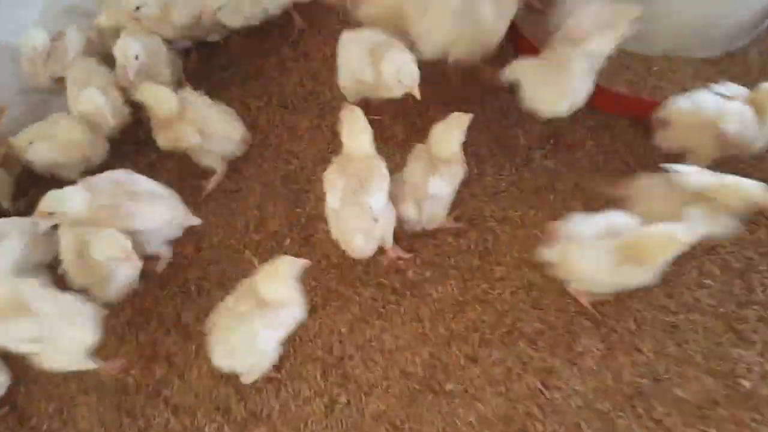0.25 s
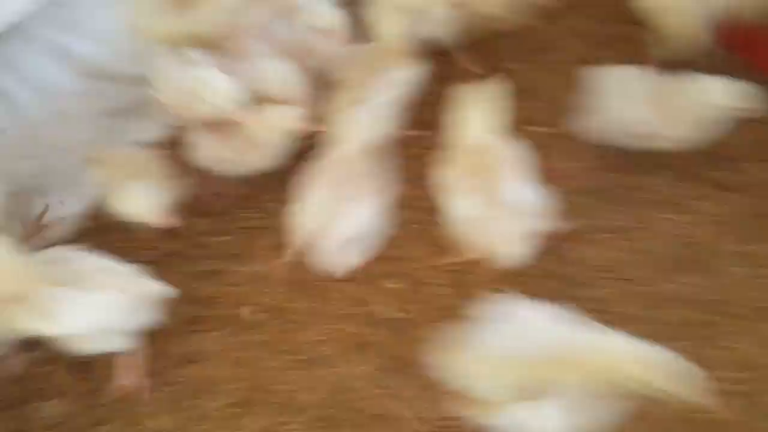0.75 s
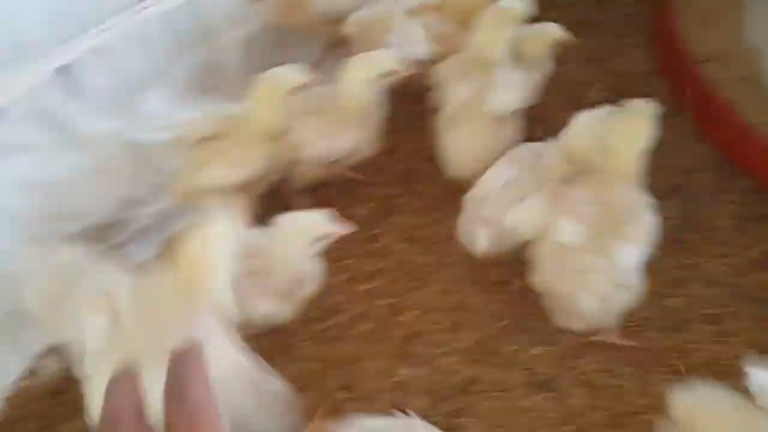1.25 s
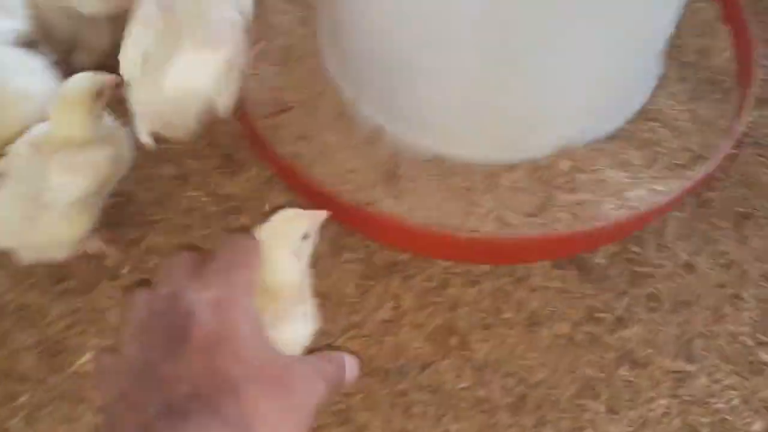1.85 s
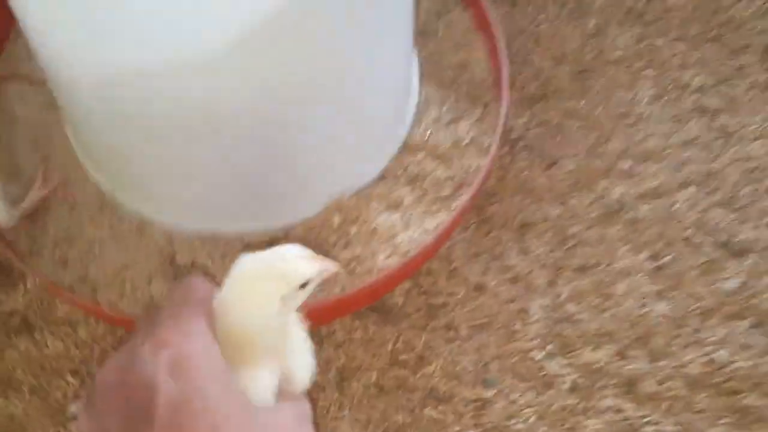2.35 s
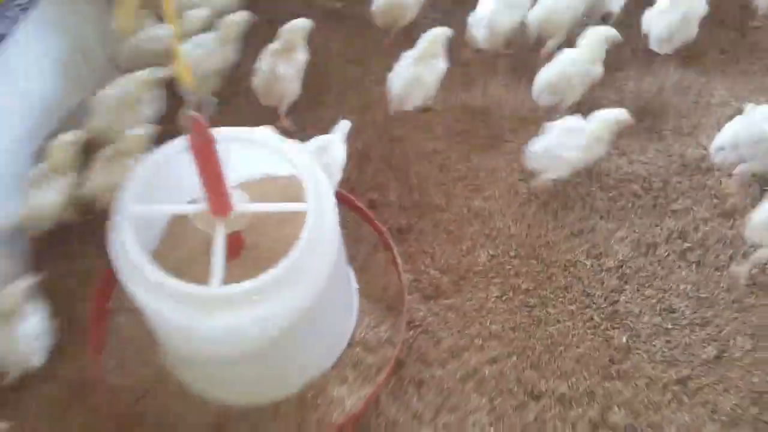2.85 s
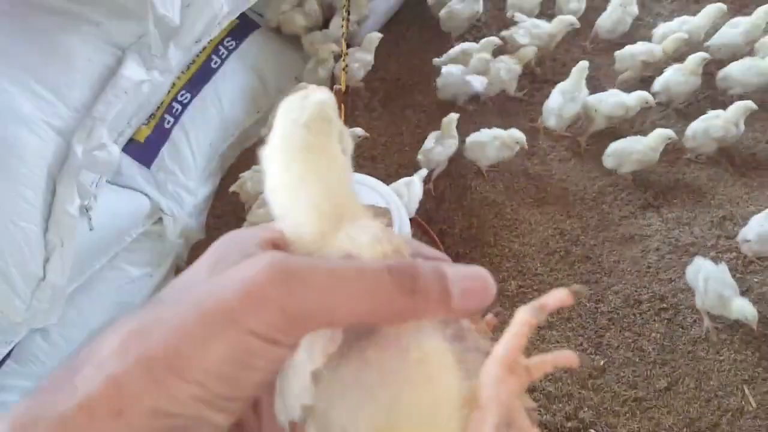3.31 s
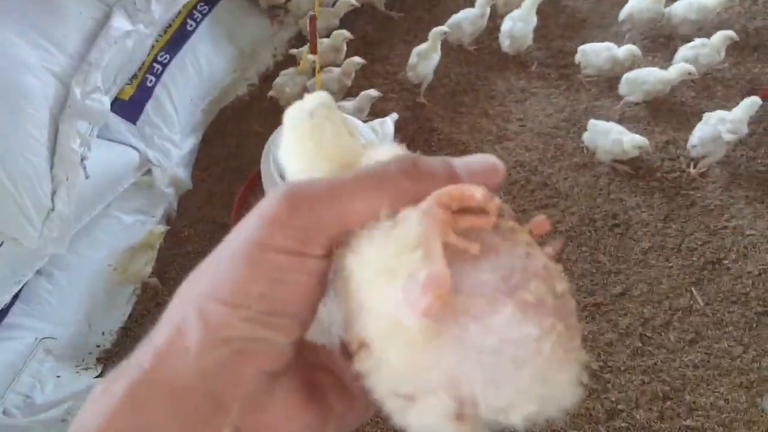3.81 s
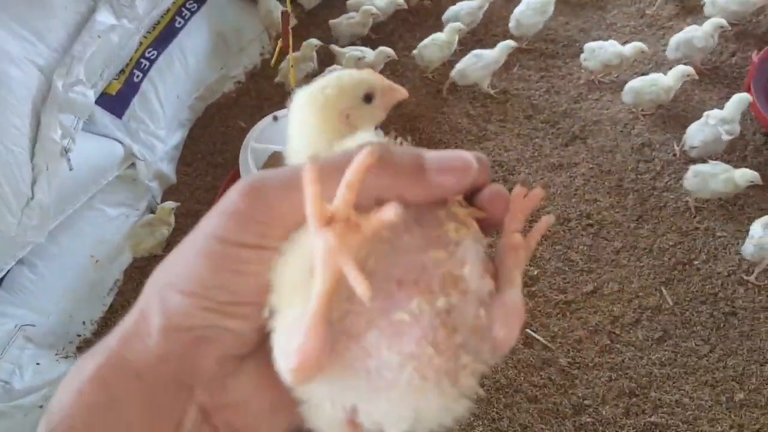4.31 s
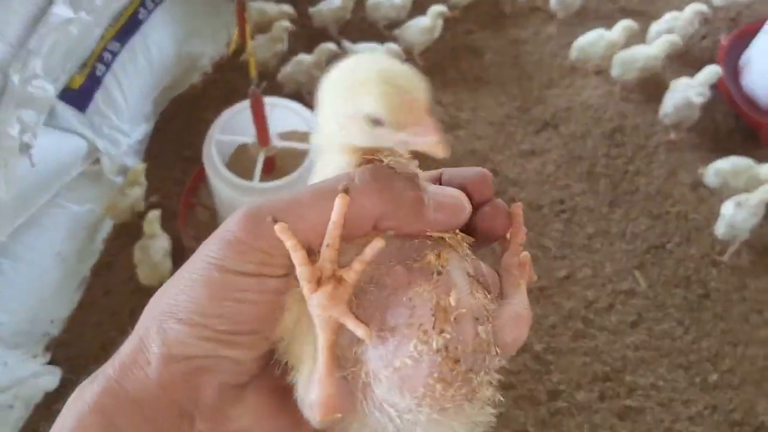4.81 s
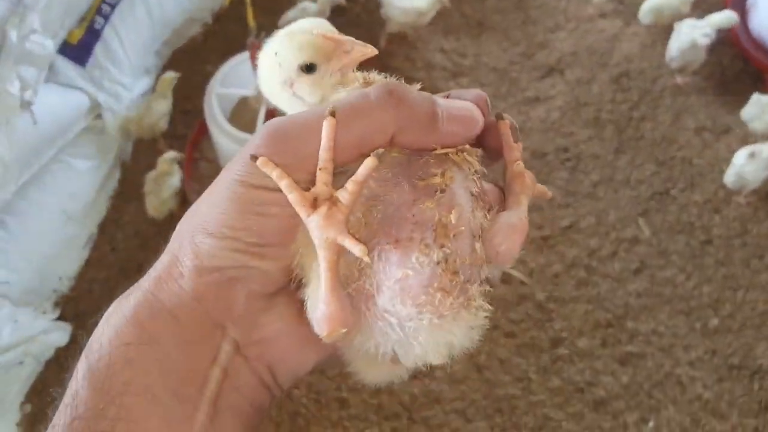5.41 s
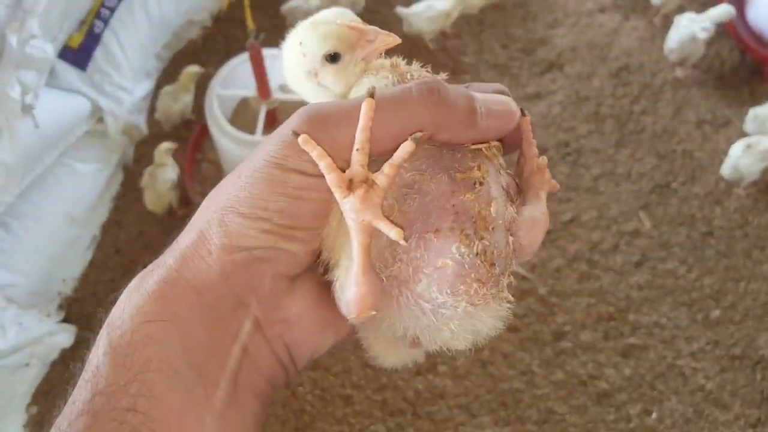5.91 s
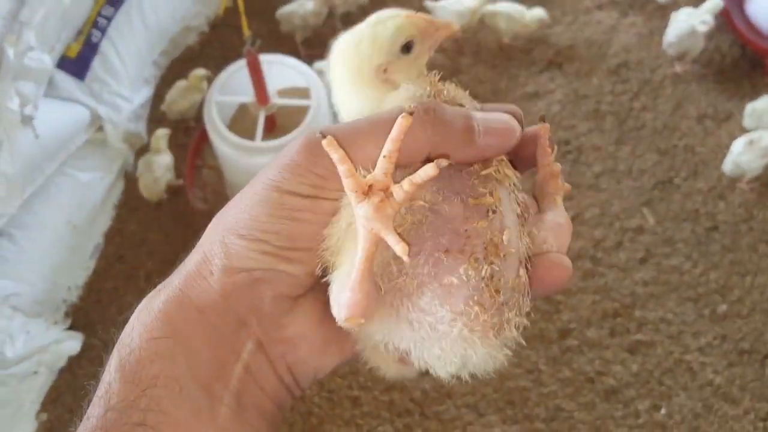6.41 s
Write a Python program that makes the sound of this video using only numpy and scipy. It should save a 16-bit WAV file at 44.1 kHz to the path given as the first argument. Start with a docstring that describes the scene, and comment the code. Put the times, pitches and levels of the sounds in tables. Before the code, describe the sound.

Dozens of young chicks peep in a dense overlapping chorus close to a handheld stereo microphone, feet rustling and tapping in dry litter. After about two seconds the near flock and rustle fade, and one chick held in the hand gives short, falling, warbling trills and thin whistles. A far flock keeps peeping diffusely in the shed, over faint insect hiss and low air rumble.

```python
"""Young chicks in a shed: falling, warbling peeps all at once, then from 2 s one chick in the hand trills close by
while the flock near it fades and a far chorus stays. Every voice is a frequency-modulated sine with weak harmonics.
Floor and feeder add two short echoes on each side, the shed a dense decay of noise. Feet rustle and tap in the litter
as filtered noise grains and damped sines. Behind lie still air, rumble at the ports, a hum, hissing insects and
low chirrups."""
import sys
import numpy as np
from scipy import signal
from scipy.io import wavfile
from scipy.ndimage import uniform_filter1d

SR = 44100
rng = np.random.default_rng(int(sys.argv[2]) if len(sys.argv) > 2 else 0)


def convert_level_to_amplitude(level_db):
    """Map a level in decibels to its linear amplitude factor."""
    exponent = np.asarray(level_db, float) / 20
    return 10 ** exponent


def log_audio(samples):
    """Write samples as a 16-bit WAV file to the path given in sys.argv[1]."""
    # one column per channel
    frames = np.atleast_2d(samples).T
    # limit to full scale, then quantise
    limited = np.clip(frames, -1, 1)
    pcm = np.round(limited * 32767).astype(np.int16)
    wavfile.write(sys.argv[1], SR, pcm)


N = 293706         # samples
RUN_IN = SR // 2   # samples; the flock is already calling at the start

# Overtones of the syrinx. Entries: level of the 2nd, 3rd and 4th harmonic in dB against the
# fundamental, ahead of the weighting by throat and beak.
OVERTONES = [-24.5, -50, -49]


def rms_one(x):
    """Normalisation: the mean power becomes 1."""
    return x / np.sqrt(np.mean(x ** 2) + 1e-20)


def in_time(rows):
    """Linear interpolation of (seconds, value) rows at every sample."""
    return np.interp(np.arange(N) / SR, *np.transpose(rows))


def at_hz(points, hz):
    """Interpolation of (Hz, value) rows on a logarithmic frequency axis."""
    return np.interp(np.log(hz), np.log(np.array(points)[:, 0]), np.array(points)[:, 1])


def drift(rate_hz):
    """Low-pass filtered noise: a slow random curve of spread 1, computed at every 40th sample."""
    r = np.exp(-2 * np.pi * rate_hz * 40 / SR)
    white = rng.standard_normal(N // 40 + 2002)
    slow = signal.lfilter([1], [1, -2 * r, r * r], white)[2000:]   # the filter has settled
    return np.interp(np.arange(N) / 40, np.arange(len(slow)), rms_one(slow - slow.mean()))


def whistle(out, at, hz, level, lag, pan_db, half=0, patchy=1, throat=1, overtones_db=OVERTONES):
    """Harmonic synthesis of the syrinx, placed by interaural delay: the left port hears it lag samples late."""
    phase = 2 * np.pi * np.cumsum(hz) / SR
    for side, late, db in ((0, lag, pan_db / 2), (1, 0.0054, -pan_db / 2)):
        p = phase - 2 * np.pi * hz * late / SR
        subharmonics = half * np.sin(p / 2) + .5 * half * np.sin(3 * p / 2)
        harmonics = sum(convert_level_to_amplitude(o) * np.sin((k + 2) * p) for k, o in enumerate(overtones_db))
        wave = throat * (np.sin(p) + subharmonics) + patchy * harmonics
        out[side, at:at + len(hz)] += (convert_level_to_amplitude(db) * level * wave)[:out.shape[1] - at]


def typed_calls(calls, places, waver_db, warble_hz, throat_depth, beak_db):
    """Frequency and amplitude modulation from turn to turn, with random waver and period doubling at voice breaks."""
    # Voice breaks, every second cycle weaker. Each row: start in seconds, end in seconds,
    # level of the half-pitch tone in dB against the fundamental.
    breaks = [(2.19, 2.262, -17.5), (2.737, 2.745, -23.5), (4.932, 4.948, -21.5), (5.31, 5.351, -12.5)]
    # Throat resonance: the low turns are the loud ones. Each row: frequency in Hz, gain in dB at depth 1.
    throat_gain = [(3000, 3), (3400, -2), (3700, -6), (4000, -5.5)]
    out, half = np.zeros((2, N)), np.zeros(N)
    waver = waver_db * np.tanh(drift(180))
    wobble = warble_hz * drift(58.2)
    for begin, end, db in breaks:
        half[int(begin * SR):int(end * SR)] = convert_level_to_amplitude(db)
    half = uniform_filter1d(half, size=130)
    patchy = convert_level_to_amplitude(beak_db + 5 * np.tanh(drift(90)))   # gain of the overtones
    for rows, (lag, pan_db) in zip(calls, places):
        s, hz, db = np.transpose(rows)
        turns = np.arange(len(s))
        n = np.arange(int((s[0] - .0025) * SR), int((s[-1] + 0.0058) * SR))
        step = np.interp(n / SR, s, turns)
        step = step - 0.59 * np.sin(2 * np.pi * step) / (2 * np.pi)   # lingers at each turn
        fade = signal.windows.tukey(len(n), min(1, 0.012 * SR / len(n)))
        level = np.sqrt(2) * fade * convert_level_to_amplitude(np.interp(step, turns, db) + waver[n])
        pitch = np.interp(step, turns, hz) + wobble[n]
        throat = convert_level_to_amplitude(throat_depth[n] * at_hz(throat_gain, pitch))
        whistle(out, n[0], pitch, level, lag, pan_db, half[n], patchy[n], throat)
    return out


def trill(first_s, dips, period_s, first_hz, last_hz, end_s, top_hz, end_hz, end_db):
    """Periodic frequency modulation: turns (s, Hz, dB) at top and dip alternately, then a closing rise and fall."""
    # Pitch at which the tops start. Each row: time in seconds, frequency in Hz.
    tops = [(2.2, 3720), (2.36, 4020), (3.0, 3970), (3.36, 3720), (4.4, 3900)]
    # How hard the chick calls. Each row: time in seconds, level in dB ahead of throat and waver.
    effort = [(2.025, -40), (2.04, -25), (2.138, -47), (2.15, -25), (2.2, -25), (2.357, -27.5), (2.4, -22),
              (2.585, -13.5), (2.73, -11), (2.947, -33), (2.965, -17), (3.015, -26), (3.045, -31),
              (3.065, -19.5), (3.08, -25), (3.36, -23), (3.443, -25.5), (3.497, -15), (3.76, -27),
              (3.81, -22.5), (3.883, -26), (3.9, -17), (3.943, -28.5), (3.959, -18.5), (4.028, -19.5),
              (4.045, -18), (4.365, -21.5), (4.39, -19.5), (4.481, -18), (4.507, -14.5), (4.814, -21.5),
              (4.845, -15.5), (4.88, -19.5), (4.903, -15.5), (4.935, -15.5), (4.954, -23.5), (5.347, -24),
              (5.378, -17.5), (5.41, -23), (5.43, -31), (5.886, -30.5), (6.52, -35)]
    u = np.repeat(np.linspace(0, 1, int(dips)), 2)
    low = first_hz + (last_hz - first_hz) * u ** 0.95   # moves almost evenly from the first dip to the last
    # the tops sag by 192.6 Hz over a trill and follow a share of the dips' height above 3 kHz
    high = np.interp(first_s, *np.transpose(tops)) - 192.6 * u + 0.232 * (low - 3000)
    hz = np.where(np.arange(len(u)) % 2, low, high)
    s = first_s + period_s * (np.arange(len(u)) - 1) / 2
    closing_rise_s = min(0.0171, 0.46 * (end_s - s[-1]))
    s = np.append(s, [s[-1] + closing_rise_s, end_s])
    hz = np.append(hz, [top_hz, end_hz])
    db = np.interp(s, *np.transpose(effort))
    db[0] -= 9.5   # the first top is still faint
    db[-1] = end_db
    return np.transpose([s, hz, db])


def note(from_s, to_s, from_hz, to_hz, db, edge_db=-5):
    """Linear frequency glide: turns (s, Hz, dB) of a plain tone that swells and fades."""
    share = np.array([0, 0.24, 1])   # of its length; loudest at the middle turn
    s, hz = from_s + share * (to_s - from_s), from_hz + share * (to_hz - from_hz)
    return np.transpose([s, hz, db + edge_db * np.array([1, 0, 1])])


def peep(end_s, from_hz, to_hz, db):
    """Falling chirp: turns (s, Hz, dB) of a faint rise to the top, then a louder fall."""
    top_s = end_s - 0.023
    return [(top_s - .012, from_hz - 323, db - 7), (top_s, from_hz, db - 3.5), (end_s, to_hz, db)]


def chick_in_hand():
    """Close source of changing bearing and directivity: trills and thin whistles, turned about the microphones."""
    # Warbling part of each trill. Each row: first dip in seconds, number of dips, seconds from dip to dip,
    # first dip in Hz, last dip in Hz.
    trills = [(2.025, 1, .01, 3400, 3400), (2.139, 1, .01, 3450, 3450), (2.205, 2, .031, 3100, 3200),
              (2.357, 2, .030, 3080, 2560), (2.585, 6, .025, 3020, 3250), (2.946, 5, .0283, 2870, 2680),
              (3.359, 6, .0277, 3230, 2750), (3.771, 2, .029, 3520, 3430), (3.884, 1, .012, 3060, 3060),
              (3.943, 1, .012, 2990, 2990), (4.028, 1, .018, 3244, 3250), (4.367, 2, .029, 3500, 2970),
              (4.481, 1, .028, 3026, 3026), (4.813, 5, .0301, 3350, 2805), (5.347, 3, 0.032, 3560, 3000),
              (5.886, 3, 0.031, 3520, 2960), (6.452, 3, .028, 2800, 2620)]
    # Turn that closes each trill, up once more and then down. Each row: end in seconds, top in Hz, end in Hz,
    # level at the end in dB ahead of throat and waver.
    closes = [(2.056, 3520, 2400, -17), (2.162, 3650, 2350, -19.5), (2.268, 3550, 2290, -22.5),
              (2.414, 3480, 2416, -18), (2.75, 3334, 2890, -18), (3.09, 3520, 2190, -15.5),
              (3.528, 3454, 2130, -22.5), (3.832, 3700, 3070, -29), (3.913, 3650, 2460, -29),
              (3.977, 3770, 2586, -32), (4.062, 3555, 2410, -17), (4.422, 3720, 2680, -27),
              (4.524, 3680, 2197, -24.5), (4.965, 3010, 2220, -31.5), (5.457, 3350, 2340, -34),
              (5.983, 2604, 2300, -40), (6.537, 3444, 2520, -34.5)]
    # Thin whistles that lead into some trills or trail them. Each row: start in seconds, end in seconds,
    # start in Hz, end in Hz, peak level in dB ahead of throat and waver.
    whistles = [(4.064, 4.081, 2388, 2490, -20), (4.294, 4.338, 3440, 4010, -30),
                (4.736, 4.785, 3855, 3810, -18.5), (5.293, 5.365, 3860, 3890, -27),
                (5.82, 5.883, 3730, 3580, -28.5), (5.792, 5.894, 4100, 4010, -32)]
    # Hand and head turn the chick. Each row: time in seconds, left minus right in dB,
    # samples by which the left port hears late.
    head = [(2.05, 5, -5), (2.3, 2, -4), (2.65, 4, -5.5), (3.03, 3, -10), (3.43, 3, -4), (3.8, -3, -4),
            (3.93, 1.5, -5), (4.05, 4, -5), (4.39, -3, -3), (4.5, 2, -3), (4.76, -8, -2), (4.88, 1.5, -1.5),
            (5.35, -3, -4), (5.9, 6, -4)]
    # How strongly the throat weights the turns, as the neck bends and stretches. Each row: time in seconds, depth.
    neck = [(2.4, .5), (2.58, 1.7), (2.95, .9), (3.4, .7), (4.85, 0.85), (6.4, 1.64)]
    # An open beak towards the microphones brings out the overtones. Each row: time in seconds, mean gain in dB.
    beak = [(2.05, 3.5), (2.4, 7.5), (2.7, -7), (3.0, 3.5), (3.48, 0), (3.79, 2), (3.95, -10), (4.055, 8),
            (4.9, -10), (4.94, 3.5), (5.39, -1), (5.45, -5)]
    calls = [trill(*row, *close) for row, close in zip(trills, closes)]
    calls += [note(*row, edge_db=-10) for row in whistles]   # they creep in and out
    s, pan_db, lag = np.transpose(head)
    middles = [call[:, 0].mean() for call in calls]
    facing = [(np.interp(middle, s, lag), np.interp(middle, s, pan_db)) for middle in middles]
    return typed_calls(calls, facing, 3.5, 29.6, in_time(neck), in_time(beak))


def chicks_underfoot():
    """Scattered near sources: single peeps and level notes, each with its own interaural delay and level difference."""
    # Loudest falling peeps. Each row: end in seconds, top in Hz, end in Hz, level at the end in dB ahead of waver.
    peeps = [(0.24, 2960, 2380, -28.5), (0.34, 3410, 2680, -26), (.4, 3000, 2240, -17.5),
             (0.434, 2900, 2330, -24.5), (0.546, 2700, 2220, -22.5), (1.004, 3390, 2496, -25.5),
             (1.291, 4500, 2930, -36), (1.318, 3860, 3200, -30.5), (1.372, 2895, 2390, -26),
             (1.397, 3000, 2137, -23.5), (1.467, 2850, 2393, -18), (1.489, 2800, 2312, -26),
             (1.574, 3810, 3230, -36.5), (1.611, 3880, 3026, -28), (1.683, 3900, 2810, -26),
             (2.293, 3290, 2170, -30), (2.919, 2700, 2034, -34.5), (3.023, 3300, 2360, -26.5)]
    # Loudest level notes. Each row: start in seconds, end in seconds, start in Hz, end in Hz,
    # peak level in dB ahead of waver.
    notes = [(0.171, 0.182, 2698, 2754, -13), (0.257, 0.272, 2550, 2665, -21),
             (0.359, 0.389, 3050, 3046, -15), (.4, 0.418, 3126, 3365, -24), (0.525, 0.526, 2460, 2610, -26),
             (0.563, 0.581, 2660, 2870, -17), (0.61, 0.645, 3124, 2990, -22),
             (0.793, 0.811, 2177, 2234, -24.5), (0.842, 0.87, 2360, 2350, -25),
             (0.88, 0.905, 3820, 3990, -40), (0.906, 0.936, 3830, 4166, -30),
             (0.909, 0.923, 2230, 2300, -25), (0.93, 0.975, 3290, 3410, -29),
             (.975, 0.978, 2620, 2660, -12.5), (1.042, 1.085, 2797, 2640, -25.5),
             (1.135, 1.157, 2620, 2590, -21), (1.213, 1.254, 2500, 2440, -26.5),
             (1.616, 1.631, 2883, 3070, -19), (1.71, 1.747, 2080, 2206, -32.5),
             (1.761, 1.783, 3400, 3790, -29.5), (1.789, 1.8, 3240, 2980, -25.5),
             (2.2, 2.251, 2334, 2290, -32), (2.302, 2.354, 2420, 2430, -39),
             (3.03, 3.064, 2787, 2740, -24.5)]
    calls = [peep(*row) for row in peeps] + [note(*row) for row in notes]
    places = rng.random((len(calls), 2)) * [5, 4] + [-5, 1]   # lag in samples, pan in dB
    return typed_calls(calls, places, waver_db=7, warble_hz=110, throat_depth=np.zeros(N), beak_db=0)


def flock(per_s, spread_db, longest_s):
    """Random superposition: many falling, warbling peeps; the low turns of the warble are the loud ones."""
    out = np.zeros((2, N + RUN_IN))
    for at, top, fall, long, fast, deep, loud, lag, pan in rng.random((int(per_s * N / SR), 9)):
        u = np.linspace(0, 1, int((0.0252 + longest_s * long) * SR))   # longest_s adds to 25 ms
        warble = np.cos(2 * np.pi * (28 + 14 * fast) * u * len(u) / SR + 2 * np.pi * lag)
        glide = 2450 + 1700 * top ** 1.4 - (200 + 700 * fall) * u ** 1.7
        hz = glide + (100 + 350 * deep) * warble
        db = spread_db * loud - 5 * abs(hz / 1000 - 2.3) - 3 * warble
        level = np.sin(np.pi * u ** .7) * convert_level_to_amplitude(db)
        start, late, pan_db = int(at * (N + RUN_IN)), 16 * (lag - .7), 2.3 + 10.0 * (pan - .5)
        whistle(out, start, hz, level, late, pan_db, overtones_db=OVERTONES[:1])
    return out


def evened(crowd):
    """Power averaging: so many voices hold a steady total level; the run-in is dropped."""
    power = uniform_filter1d(np.mean(crowd ** 2, axis=0), size=6000)
    return (crowd / np.sqrt(power))[:, RUN_IN:]


def bounced(x):
    """Specular reflection: two short echoes a side from floor and feeder."""
    # Echo delays. Rows: left, right; columns: first and second delay in seconds.
    delays = [
        [.0085, .021],
        [.0112, .027],
    ]
    out = np.zeros((2, N))
    for side, lags_s in enumerate(delays):
        for lag in (np.array(lags_s) * SR).astype(int):
            out[side, lag:] += x[side, :-lag] / np.sqrt(2)
    return out


def shed(x):
    """Diffuse reverberation off walls, sacks and roof: decaying noise, independent on each side, power gain 1."""
    u, t60_s = np.arange(RUN_IN) / SR, 0.22
    echoes = rng.standard_normal((2, RUN_IN)) * convert_level_to_amplitude(-60 * u / t60_s) * (u > .005)
    echoes = echoes / np.linalg.norm(echoes[0])
    return signal.fftconvolve(x.mean(axis=0, keepdims=True), echoes, axes=1)[:, :x.shape[1]]


def resonance(x, hz, width_hz):
    """Two-pole resonator with gain 1 at its peak."""
    r = np.exp(-np.pi * width_hz / SR)
    poles = [1, -2 * r * np.cos(2 * np.pi * hz / SR), r * r]
    return signal.lfilter(np.array([1, 0, -1]) * (1 - r * r) / 2, poles, x)


def near_flock():
    """Direct sound plus reverberation of the flock close by."""
    # Each row: time in seconds, level in dB.
    chorus = [(0, -24), (.42, -23), (.5, -25), (1.0, -27), (1.5, -31.5), (1.95, -38.5), (2.4, -35),
              (3.6, -39), (6.66, -61)]
    crowd = flock(per_s=190, spread_db=14, longest_s=.03)
    return convert_level_to_amplitude(in_time(chorus)) * evened(crowd + convert_level_to_amplitude(-3.5) * shed(crowd))


def far_flock():
    """Diffuse field alone: the rest of the flock, heard only through the shed and band-limited by a resonance."""
    # Each row: time in seconds, level in dB.
    distance = [(0, -33), (3.5, -36), (6.66, -36.5)]
    crowd = flock(per_s=170, spread_db=20.0, longest_s=.12)
    return convert_level_to_amplitude(in_time(distance)) * evened(resonance(shed(crowd), 2690, 383))


def coloured(white, spectrum, patchy_db):
    """Subtractive synthesis: half-octave noise bands with own level, flicker and stereo correlation; rms 1."""
    # Each row: frequency in Hz, left-right correlation.
    likeness = [(40, 0.91), (290, 0.94), (640, 0.5), (1400, 0.025), (15000, 0.035)]
    out, edges = 0, 25 * 2 ** np.arange(0, 9.6, .5)
    for k, (low, high) in enumerate(zip(edges, edges[1:])):
        band = signal.butter(2, [low, high], "band", fs=SR, output="sos")
        mid, side = signal.sosfilt(band, white[k % 2])   # neighbouring bands use independent noise
        centre = np.sqrt(low * high)
        alike = np.clip(at_hz(likeness, centre), 0, 1)
        gain = convert_level_to_amplitude(at_hz(spectrum, centre) + patchy_db * min(1, 5000 / high) * drift(14))
        out = out + gain * (np.sqrt(1 + alike) * mid + np.sqrt(1 - alike) * side * [[1], [-1]])
    return rms_one(out)


def litter_rustle():
    """Granular noise: dense grains of small feet in husks, in clumps, over a steady noise floor."""
    # Feet in the litter. Each row: time in seconds, level in dB ahead of the offset of each side.
    scurry = [(0, -38.5), (1.7, -38), (2.1, -46.5), (2.7, -48.5), (2.85, -42.5), (3.4, -50.5), (3.7, -52.5),
              (6.66, -61.5)]
    # Each row: frequency in Hz, relative spectral density in dB.
    husks = [(30, -27), (70, -7), (200, -5.5), (400, -7.5), (700, -7), (1500, -9), (3000, -9),
             (6000, -16.5), (10000, -26), (16000, -24.5)]
    struck = rng.random(N) < 400 * convert_level_to_amplitude(4.0 * drift(8)) / SR   # the density of grains drifts
    grains = struck * convert_level_to_amplitude(3.5 * np.minimum(rng.exponential(1, N), 4))
    steps = signal.lfilter([1], [1, -.75], grains * rng.standard_normal((2, 2, N)))   # soft toes: dull grains
    rustle = rng.standard_normal((2, 2, N)) + 1.78 * steps
    return convert_level_to_amplitude(in_time(scurry) + [[4.3], [2.7]]) * coloured(rustle, husks, patchy_db=3.5)


def litter_taps():
    """Damped free vibration: single taps that ring briefly, with a bright tick of decaying noise."""
    # Each row: time in seconds, level of the ring at its onset in dB, ring in Hz.
    taps = [(0.661, -28.5, 730), (0.866, -22, 736), (1.043, -26.5, 800), (1.517, -23.5, 282),
            (1.694, -23, 1120), (2.01, -24.5, 1020), (2.789, -28, 1100), (2.837, -26, 590),
            (3.13, -34, 890)]
    out, u = np.zeros((2, N)), np.arange(1500) / SR
    for (s, db, hz), puff in zip(taps, rng.standard_normal((len(taps), 2, len(u)))):
        ring = np.sin(2 * np.pi * hz * u) * np.exp(-u / 0.0032)
        tick = convert_level_to_amplitude(-15.5) * puff * np.exp(-u / 0.0044)
        out[:, int(s * SR):int(s * SR) + len(u)] += convert_level_to_amplitude(db) * (ring + tick)
    return out


def port_rumble():
    """Band-passed noise, partly correlated between the sides: hand and air on the ports, in lumps."""
    # Each row: time in seconds, mean level in dB.
    bumps = [(0, -80), (1.4, -51), (2.6, -56.5), (2.87, -42), (3.1, -43.5), (3.3, -58.5), (3.6, -58),
             (3.79, -39), (3.95, -55), (4.8, -55.5), (4.88, -43), (4.97, -63)]
    white = rng.standard_normal((2, N))
    band = signal.butter(2, [52, 160], "band", fs=SR, output="sos")
    rumble = signal.sosfilt(band, white + 0.25 * white[:1])
    return convert_level_to_amplitude(in_time(bumps) + 6 * np.tanh(drift(14))) * rms_one(rumble)


def insects():
    """Narrow-band noise with fast random amplitude modulation: a high hiss, slightly louder on the left."""
    band = signal.butter(2, [7150, 8416], "band", fs=SR, output="sos")
    hiss = signal.sosfilt(band, rng.standard_normal((2, N))) * convert_level_to_amplitude([[1.2], [-1.2]])
    return convert_level_to_amplitude(-48.5 + 1.57 * drift(140)) * rms_one(hiss)


def hum():
    """Pure tone of 421 Hz whose level drifts slowly."""
    return np.sqrt(2) * convert_level_to_amplitude(-65 + 2.0 * drift(1.8)) * np.sin(2 * np.pi * 421 * np.arange(N) / SR)


def far_chirrups():
    """Resonant filtering of noise: two faint low bands that swell and sink independently."""
    white, out = rng.standard_normal((2, N)), 0
    for hz in (1220, 1350):
        out = out + convert_level_to_amplitude(13.0 * np.tanh(drift(4.4))) * resonance(resonance(white, hz, 81), hz, 81)
    return convert_level_to_amplitude(-55.5) * rms_one(out)


def still_air():
    """Stationary coloured noise with a flicker in every band: the still air of the shed."""
    # Each row: frequency in Hz, relative spectral density in dB.
    air = [(30, 0), (60, 7.5), (100, -1.5), (300, -3.5), (900, -22), (1800, -33), (5200, -1.5),
           (6200, -34.5), (10000, -32), (16000, -19)]
    return convert_level_to_amplitude(-52) * coloured(rng.standard_normal((2, 2, N)), air, patchy_db=4.5)


def scene():
    """Superposition of direct sound, echoes and diffuse field: near voices mostly dry, the far flock all diffuse."""
    held, near = chick_in_hand(), chicks_underfoot()
    echoes = bounced(convert_level_to_amplitude(-15) * held + convert_level_to_amplitude(-8) * near)   # weaker for the chick close by
    reverberation = shed(convert_level_to_amplitude(-16) * held + convert_level_to_amplitude(-8) * near)
    voices = held + near + echoes + reverberation + near_flock() + far_flock()
    feet = litter_rustle() + litter_taps()
    background = port_rumble() + insects() + hum() + far_chirrups() + still_air()
    return voices + feet + background


def low_pass(x):
    """Removes everything above the highest recorded frequency."""
    return signal.sosfilt(signal.butter(12, 15680, fs=SR, output="sos"), x)


def record(dry):
    """Recording: the finished stereo mix goes through one last processing stage."""
    return low_pass(dry)


dry = scene()
out = record(dry)
log_audio(out)
```